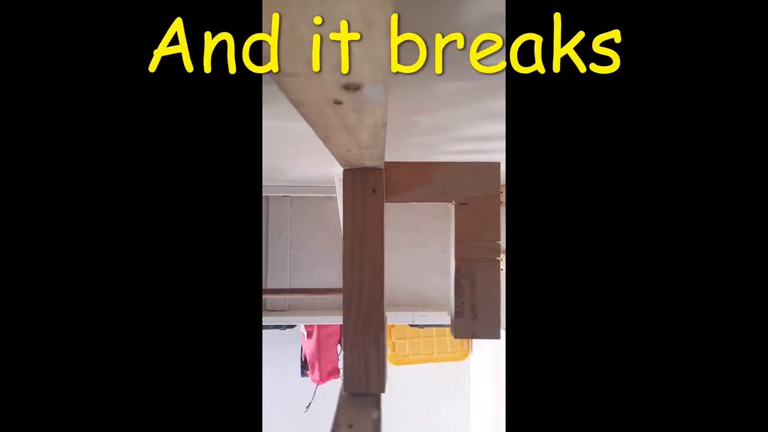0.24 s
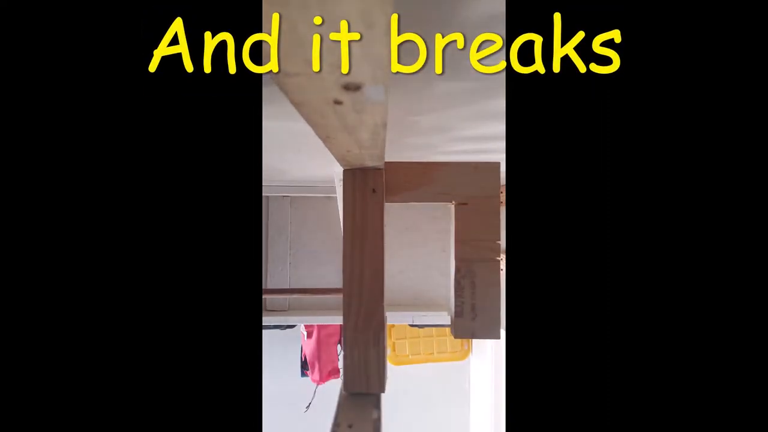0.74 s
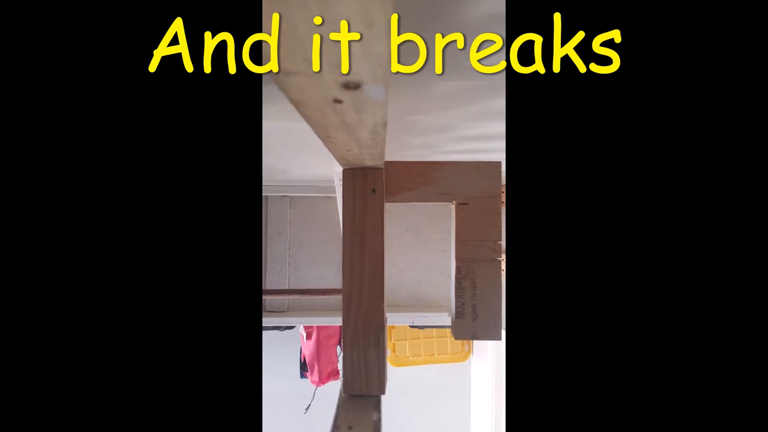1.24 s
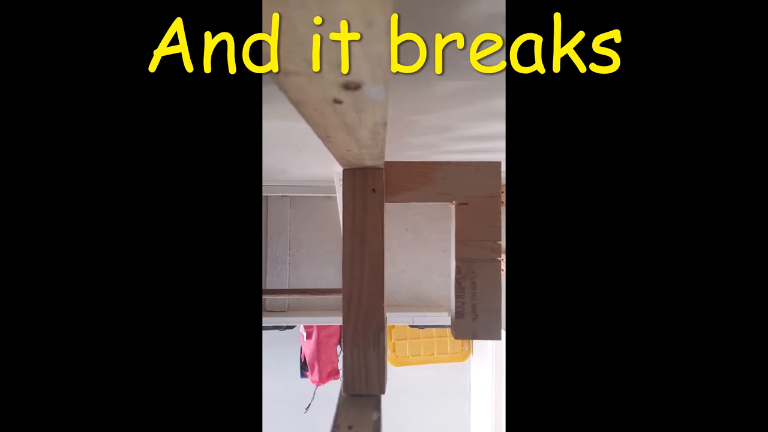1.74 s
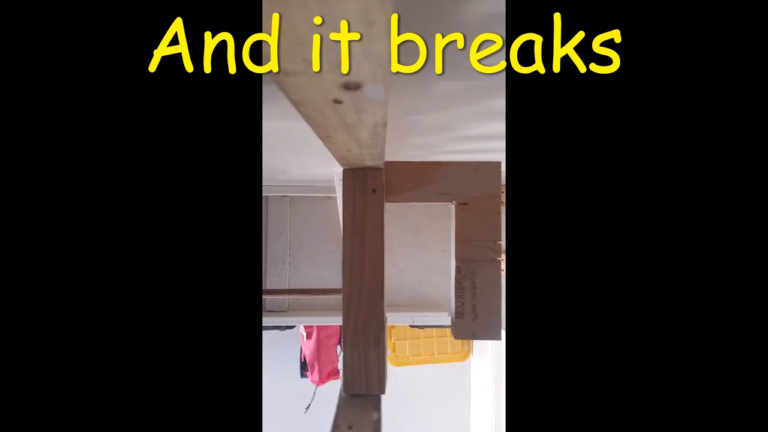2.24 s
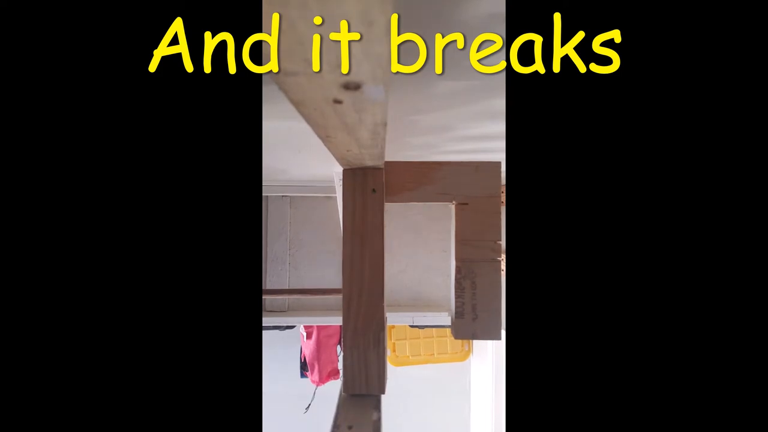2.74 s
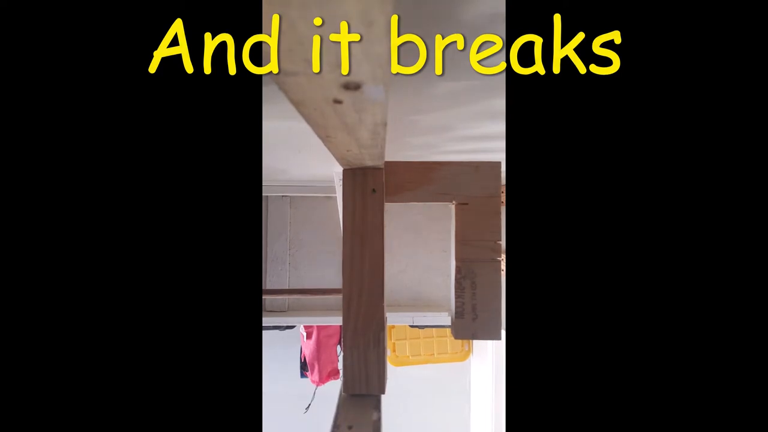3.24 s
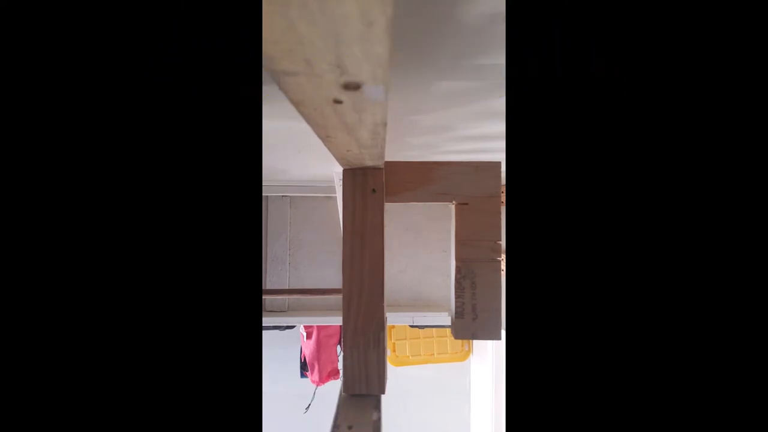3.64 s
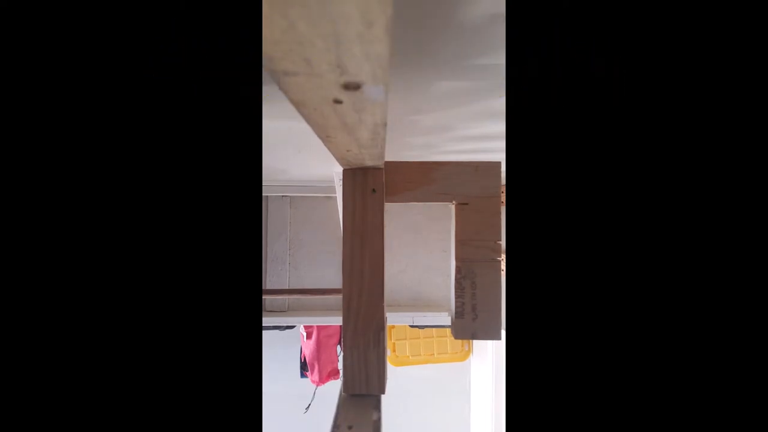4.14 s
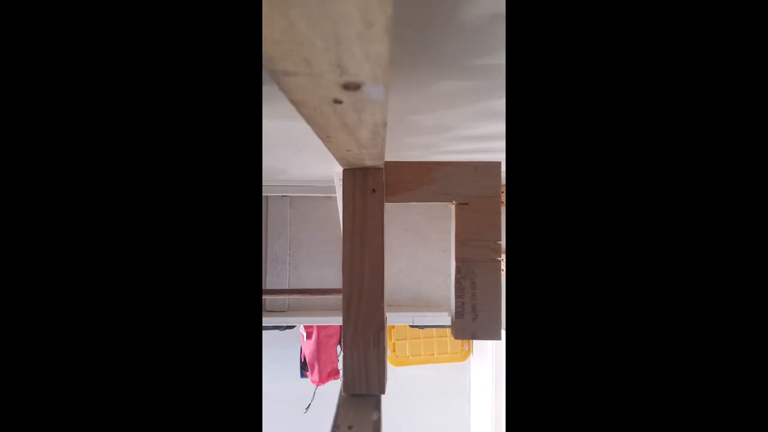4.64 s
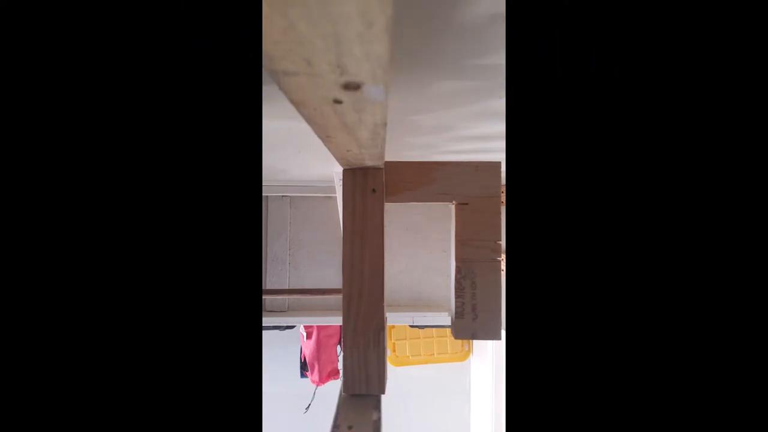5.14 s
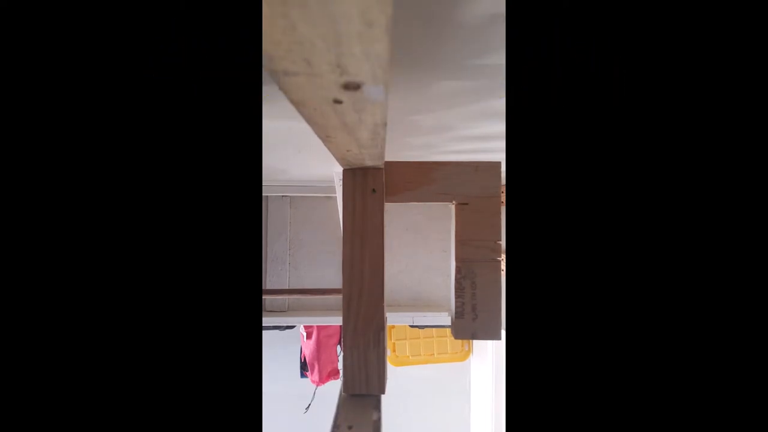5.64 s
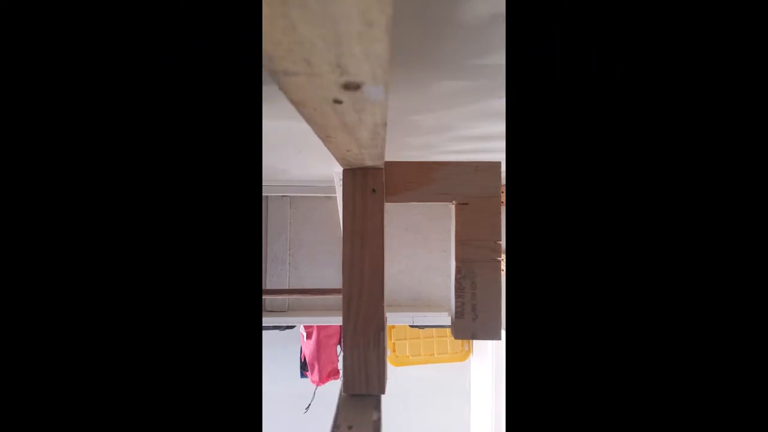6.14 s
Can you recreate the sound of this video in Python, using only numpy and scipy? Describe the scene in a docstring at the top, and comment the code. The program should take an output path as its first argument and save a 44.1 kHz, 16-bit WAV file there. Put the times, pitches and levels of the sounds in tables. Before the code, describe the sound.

A thin, sizzling air leak grows loud and blows on the microphone, stops dead, then small clicks and a rising low compressor drone.

```python
"""Compressed air hisses from a leaking nailer in a workshop; the jet swings closer, blows on the microphone and stops.
The jet is shaped noise with fluttering, half-whistling resonances; its wind is low noise in gusts, plus soft thumps.
A piston compressor hums behind it, faded in by the gain: tones and noise locked to the turning crank.
A few small clicks, bursts of noise with a short ring, sound; later the level dips briefly."""
import sys
import numpy as np
from scipy import signal
from scipy.fft import rfft, irfft, next_fast_len
from scipy.io import wavfile
from scipy.ndimage import uniform_filter1d, map_coordinates

SR = 44100
rng = np.random.default_rng(int(sys.argv[2]) if len(sys.argv) > 2 else 0)


def bounce(signal):
    """Save signal as a 16-bit WAV file at the path given by the first command-line argument."""
    frames = np.transpose(np.atleast_2d(signal))
    limited = np.clip(frames, -1, 1)
    pcm = np.round(limited * 32767).astype(np.int16)
    wavfile.write(sys.argv[1], SR, pcm)


N = 281181

# strength of the jet as the nailer comes closer, for rush, sizzle and air stream: (time [s], level [dB])
JET_STRENGTH = [(0, -57), (.7, -56), (1.2, -52.5), (1.62, -43), (1.84, -37.5), (2.36, -39.5)]
# the sizzle is beamed where the jet points: (time [s], relative level [dB], left-right difference [dB])
SIZZLE_AIM = [(0, 9, 0), (.38, 9.5, -2), (.5, 8.5, 1.5), (.8, 8.5, 0.5), (1.2, 6.5, 1.5), (1.5, 7.5, 0),
              (1.63, 7, -1.5), (1.8, 9, -2), (2.0, 10, -0.5), (2.09, 7.8, -1.5), (2.35, 8, -1.5)]
# resonances of the gap that swell and fade as the nailer moves:
# (centre [Hz], half width [Hz], gain [dB], strongest at [s], half length [s])
GAP_RESONANCES = [(12350, 220, 0, .3, 0.24), (11700, 230, 1, 0.73, 0.37), (13150, 140, -1.5, .8, .4),
                  (12330, 140, 3.5, 1.45, 0.2), (12100, 50, -4, 1.9, .25), (12455, 30, -1, 1.8, .3),
                  (12700, 350, -5, 1.95, .35), (12000, 150, -7, 1.95, .2), (11600, 25, -2, 1.9, .3),
                  (3850, 200, -4, 0.31, 0.74), (2100, 150, -10, 0.7, 0.39), (6600, 200, -7, 0.96, 0.38),
                  (4430, 150, -10, 1.55, .5)]
# spectrum of the high sizzle: (frequency [Hz], relative density [dB])
SIZZLE_SPECTRUM = [(7000, -57), (8500, -26), (9100, -21.5), (9700, -15), (10500, -16.5), (11100, -7.5),
                   (11800, -4.7), (12400, -4.5), (13200, -6), (13800, -10), (15000, -10.5), (15900, -13)]
# spectrum of the broad rush: (frequency [Hz], relative density [dB])
RUSH_SPECTRUM = [(300, -15), (520, -19.5), (660, -13), (850, -10), (1050, -8), (1370, -7), (1630, -9.5),
                 (2000, -3), (2400, -2.5), (2800, -4.5), (3150, -4.5), (3750, 0), (5200, 0), (6900, -1.5),
                 (7600, -5.5), (8500, -18), (11000, -37)]
# how alike the jet is in the two channels: (frequency [Hz], likeness [-1 to 1])
JET_LIKENESS = [(600, 0.39), (1400, -0.35), (3100, 0.5), (7000, -0.033), (12500, 0.18), (15000, 0.35)]
# colour of the jet at the two ports, after its direction: (frequency [Hz], left-right difference [dB])
JET_PORT_COLOUR = [(1000, 1.5), (2600, 0.5), (4000, 1), (4900, 4), (5800, 4), (7000, 2), (8500, -7),
                   (10300, 5.5), (11600, 2), (12400, 2), (13200, -2.5), (14300, -4), (15500, 5)]
JET_LAG_S = .000095  # the jet reaches the right port first
SHUT_S, SHUT_TAKES_S, SHUT_CURVE = 2.348, 0.1, 1.9  # the leak closes: start, time to fall 60 dB, ever faster

# gusts of air on the microphone: (start [s], hold [s], relative level [dB], small eddies over the buffet [dB])
WIND_GUSTS = [(0, 0.068, -67, -22), (.19, .04, -69, -17), (0.3, 0.1, -70.5, -14), (.55, 0.082, -70, -10.5),
              (1.465, 0.028, -65.5, -5), (1.762, 0.041, -56, -8), (1.877, 0.085, -55, -8),
              (2.031, 0.088, -51.5, 1.5), (2.172, 0.095, -50, -5), (2.288, 0.095, -51.5, -8),
              (2.49, 0.047, -51, -14.5), (2.585, 0.042, -53, -16)]
GUST_RISE_DB_PER_S, GUST_FALL_DB_PER_S = 202, 171  # every gust arrives and dies alike
STREAM_DB = -26.5  # the steady air stream on the microphone, against the jet
# spectrum of the low buffeting: (frequency [Hz], relative density [dB])
BUFFET_SPECTRUM = [(20, -31), (35, -12), (55, 3), (125, -1.5), (200, -10), (350, -22), (550, -43),
                   (1200, -57)]
# spectrum of the smaller, higher eddies: (frequency [Hz], relative density [dB])
EDDY_SPECTRUM = [(80, -28), (150, -4), (260, -1.5), (420, -8), (600, -15), (1000, -21), (2500, -63)]

CRANK_HZ = 44.67
# level at which the compressor is heard, as the gain lets it in by steps: (time [s], relative level [dB])
PUMP_GAIN = [(0, -57), (.9, -38.5), (1.4, -19), (2.4, -12.5), (3.4, -12.5), (3.9, -8.5), (4.42, -8.5),
             (5.16, -0.24), (5.9, 1.05)]
# low throb of the piston: (multiple of the crank rate, relative level [dB])
THROB_ORDERS = [(1, -4.7), (2, 0), (3, -11), (4, -7.5), (5, -11.5), (6, -18.5), (7, -8.5), (8, -32),
                (9, -15.5), (10, -12), (11, -18.5), (12, -18), (13, -27), (14, -18.5), (15, -15), (16, -14),
                (17, -15.5), (18, -27), (19, -21), (20, -26.5), (21, -24.5), (22, -29), (23, -14),
                (24, -14), (25, -35), (26, -22), (27, -15.5), (28, -15), (29, -18.5), (31, -21.5)]
# higher whine of the machine: (multiple of the crank rate, relative level [dB])
WHINE_ORDERS = [(34, -8), (40, -11), (44, 0), (46, -1), (50, -8), (54, -11), (55, 0.5), (56, -3.5),
                (60, -8), (64, -11), (72, -3.5)]
# crank orders caught by a narrow resonance: (multiple of the crank rate, relative level [dB])
WHISTLE_ORDERS = [(65, -2.5), (66, -4.5), (67, -1.5)]
# level of the whistle, which swells late in the scene: (time [s], relative level [dB])
WHISTLE_SWELL = [(4.6, -65), (5.3, -60.5), (5.65, -60.5), (5.82, -59), (6.0, -61.5), (6.3, -57.5)]
# motor tones of fixed pitch: (frequency [Hz], relative level [dB])
MOTOR_TONES = [(119.6, -63.5), (328, -62.5), (343.3, -57.5)]
# spectrum of the casing noise: (frequency [Hz], relative density [dB])
CASING_SPECTRUM = [(25, -7), (60, -1), (150, 0.5), (230, -1.5), (320, 0), (420, -1.5), (560, -5),
                   (720, 2.5), (820, -4.5), (1000, -5), (1150, -6), (1340, -2.5), (1490, -5), (1680, -2.5),
                   (1880, 1), (2100, 0), (2400, -1), (2750, -8.5), (3600, -42)]
# spectrum of the intake noise: (frequency [Hz], relative density [dB])
INTAKE_SPECTRUM = [(1800, -16), (3100, 2.5), (3900, 0.5), (4900, 3), (6700, -5.5), (7600, -11),
                   (8500, -28.5), (9700, -5), (10500, -11), (11500, -1.5), (12400, 0.5), (13400, -4),
                   (14500, -4.5), (15800, -11)]
# how alike the pump is in the two channels: (frequency [Hz], likeness [-1 to 1])
PUMP_LIKENESS = [(110, 0.96), (290, 0.8), (640, 0.41), (1400, -0.28), (3100, -0.2), (7000, 0.014),
                 (15000, -0.033)]
# colour of the pump at the two ports, after its direction: (frequency [Hz], left-right difference [dB])
PUMP_PORT_COLOUR = [(100, 1.5), (1800, 1.3), (2600, 1), (3500, 2), (5800, 1), (6700, 4), (7700, -6),
                    (9500, 1), (10600, 0), (12400, -2.5), (15000, 0)]

# single thumps of air: (time [s], relative level [dB], frequency [Hz])
AIR_PUFFS = [(1.487, -53, 90), (1.972, -51, 65), (2.025, -40.5, 75), (2.062, -48, 230), (2.115, -45, 120),
             (2.24, -44, 60), (2.29, -48, 150), (2.383, -42, 84.6), (2.51, -43, 110), (2.535, -51, 50)]

# clicks: (time [s], relative level [dB], lowest [Hz], highest [Hz], relative ring level [dB], t60 of the fade [s],
#          left-right difference of the direct sound [dB])
CONTACT_CLICKS = [(2.4835, -57, 10500, 15500, -28, .004, 0), (3.1374, -36.5, 1700, 3880, -22, .008, -4),
                  (3.138, -52, 1500, 9500, -14, 0.0095, 0), (3.156, -56, 1500, 3000, -12, .025, 0),
                  (3.345, -57, 900, 1700, -22, .013, 0), (3.3712, -44.5, 1400, 6600, -4, .011, -3)]
# ringing modes shared by the clicks: (frequency [Hz], relative level [dB])
CLICK_RING_MODES = [(2490, 2), (4150, -10), (4850, -2), (5900, -9)]
CLICK_ATTACK_S, CLICK_ROOM_DB, CLICK_ROOM_T60_S = .0008, -6, 0.15  # rise, level and length of the room tail

DIP_S, DIP_WIDTH_S, DIP_DB = 5.569, 0.018, -32  # the brief dip in level: centre, half width, depth
LOW_CUT_HZ, TOP_HZ = 30, 15780  # the microphone sheds the deepest rumble and all above its top


def amp(db):
    """Decibels to gain."""
    return 10 ** (np.asarray(db) / 20)


def unit(x):
    """x at rms 1."""
    return x / np.sqrt(np.mean(x ** 2) + 1e-20)


def along(points, hz):
    """Read (Hz, value) points on a log frequency axis."""
    f, v = np.transpose(points)
    return np.interp(np.log(hz + 1), np.log(f + 1), v)


def curves(rows):
    """One value per sample for each column after the time."""
    s, *cols = np.transpose(rows)
    return [np.interp(np.arange(N) / SR, s, c) for c in cols]


def wobble(rate):
    """A smooth random curve, rate knots a second."""
    knots = rng.standard_normal(int(N * rate / SR) + 4)
    return map_coordinates(knots, [np.arange(N) * rate / SR])


def filtered(x, response):
    """x shaped by a response of frequency."""
    m = next_fast_len(N + SR // 2)
    return irfft(rfft(x, m) * response(np.fft.rfftfreq(m, 1 / SR)), m)[..., :N]


def pan(left_db):
    """Gains of the two channels for a left-right difference in dB, steady or moving."""
    return amp(np.array([[.5], [-.5]]) * left_db)


def white():
    """Two unrelated noises."""
    return rng.standard_normal((2, N))


def coloured(pair, spectrum, alike):
    """Two unrelated signals turned into stereo of rms 1 with this spectrum and left-right likeness."""
    def mid_side_gains(hz):
        turn = np.arccos(np.clip(along(alike, hz), -1, 1)) / 2
        return amp(along(spectrum, hz)) * [np.cos(turn), np.sin(turn)]

    mid, side = filtered(pair, mid_side_gains)
    return unit(np.array([mid + side, mid - side]))


def reflected(pair, reach, sway, echo_db, count=6):
    """Adds separate echoes of nearby surfaces to each signal, about reach seconds late at most and swaying by sway."""
    n = np.arange(N)

    def echo():
        delay_s = reach * rng.uniform(0.1002, 1) + sway * wobble(1.483)
        return np.interp(n - SR * delay_s, n, pair[0])

    return np.array([x + amp(echo_db) * sum(echo() for _ in range(count)) for x in pair])


def ports(pair, sides, lag=0):
    """Stereo as the two ports hear it: each has its own colour, and the left one is lag seconds late."""
    def response(hz):
        return pan(along(sides, hz)) * np.exp(1j * np.pi * hz * lag * np.array([[-1], [1]]))

    return filtered(pair, response)


def jet_db():
    """Strength of the jet in dB: it grows as the nailer nears and plunges as the leak closes."""
    closing = np.clip((np.arange(N) / SR - SHUT_S) / SHUT_TAKES_S, 0, 2) ** SHUT_CURVE
    return curves(JET_STRENGTH)[0] - 60 * closing


def spits(rate, spread_db):
    """Sparse sharp impulses of uneven size, rate a second, at rms 1."""
    strikes = rng.random(N) < rate / SR
    return unit(strikes * amp(spread_db * rng.standard_normal(N)) * white())


def eddying(pair, depth_db):
    """Passing eddies brighten and dim narrow bands, each for a few hundredths of a second."""
    z = signal.stft(pair, nperseg=1024)[2]
    field = rng.standard_normal(z.shape[1:])
    for axis in (0, 1):  # smooth over frequency, then time
        field = uniform_filter1d(field, size=4, axis=axis)
    return signal.istft(z * amp(depth_db * unit(field)), nperseg=1024)[1][:, :N]


def leak():
    """A turbulent jet from a narrow gap: a high sizzle over a broad rush, fluttering together, each with its own spits."""
    t = np.arange(N) / SR
    beam_db, left_db = curves(SIZZLE_AIM)
    flutter_db = 0.55 * wobble(24.02) + .5 * wobble(240)

    def jet(depth_db):
        return eddying(white() + amp(-14.5) * spits(rate=410, spread_db=1.5), depth_db)

    sizzle = reflected(jet(depth_db=2.5), reach=.004, sway=.00006, echo_db=-22)
    sizzle = coloured(sizzle, SIZZLE_SPECTRUM, JET_LIKENESS)
    rush = reflected(jet(depth_db=2.8), reach=.009, sway=0.0003, echo_db=-17.5)
    rush = coloured(rush, RUSH_SPECTRUM, JET_LIKENESS)
    hiss = amp(beam_db - 1.93) * sizzle * pan(left_db) + amp(-0.58) * rush
    # the gap half whistles: its resonances stand out of the hiss, each for a while
    ringing = np.zeros((2, N))
    for hz, width, db, s, length in GAP_RESONANCES:
        swell = np.exp(-((t - s) / length) ** 2)
        ringing += amp(db) * swell * filtered(hiss, lambda f: 1 / (1 + ((f - hz) / width) ** 2))
    return amp(jet_db() + flutter_db) * ports(hiss + ringing, JET_PORT_COLOUR, JET_LAG_S)


def draught():
    """Each gust rises, holds and falls away; it buffets the left port most and sheds smaller, higher eddies."""
    t = np.arange(N) / SR

    def gust(s, hold):
        rise_db = -GUST_RISE_DB_PER_S * np.maximum(s - t, 0)
        fall_db = -GUST_FALL_DB_PER_S * np.maximum(t - s - hold, 0)
        return amp(rise_db + fall_db)

    # the strongest gust of the moment sets the level
    push = np.max([amp(db) * gust(s, hold) for s, hold, db, _ in WIND_GUSTS], axis=0)
    swirl = np.max([amp(db + eddy_db) * gust(s, hold) for s, hold, db, eddy_db in WIND_GUSTS], axis=0)
    stream = amp(jet_db() + STREAM_DB)
    buffet = np.hypot(stream, push) * coloured(white(), BUFFET_SPECTRUM, [(100, 0.078)])
    eddies = swirl * coloured(white(), EDDY_SPECTRUM, [(100, 0.25)])
    return amp(2.37 * wobble(26)) * (buffet + eddies) * pan(14.2)


def crank_tones(orders, turns, waver, swell_db):
    """Wavering tones on multiples of the crank rate; the room sets the higher ones out of step between the ears."""
    out = np.zeros((2, N))
    for k, db in orders:
        apart = np.arccos(np.clip(along(PUMP_LIKENESS, k * CRANK_HZ), -1, 1)) * rng.choice([-1, 1])
        phase = 2 * np.pi * (np.round(k) * turns + rng.random()) + waver * np.sqrt(k) * wobble(9)
        level = amp(db + swell_db * np.sqrt(k) * wobble(5))
        out += level * np.sqrt(2) * np.sin([phase + apart / 2, phase - apart / 2])
    return out


def motor_hum():
    """Motor tones of fixed pitch that waver a little in level and phase."""
    out = np.zeros(N)
    for hz, db in MOTOR_TONES:
        level = amp(db - 4.0 + 1.6 * wobble(4.3))
        phase = 2 * np.pi * hz * np.arange(N) / SR + 0.77 * wobble(5)
        out += level * np.sqrt(2) * np.sin(phase)
    return out


def casing_rattle(turns):
    """The same rattle comes round with every turn: one turn of noise, read by crank angle."""
    one_turn = rng.standard_normal((2, int(SR / CRANK_HZ)))
    rattle = one_turn[:, (turns % 1 * one_turn.shape[1]).astype(int)]
    tone_db = [(900, -20.5), (1400, -6.5), (3000, -13), (7000, -17.5)]  # (frequency [Hz], gain [dB])
    return filtered(rattle, lambda hz: amp(along(tone_db, hz)))


def compressor():
    """Each crank turn pumps a low throb, rattles the casing alike and gulps air through the intake."""
    fade_in = amp(curves(PUMP_GAIN)[0])
    turns = np.cumsum(CRANK_HZ + 0.04983 * wobble(3)) / SR
    throb = amp(-48.5) * crank_tones(THROB_ORDERS, turns, waver=0.035, swell_db=0.55)
    whine = amp(-64.0) * crank_tones(WHINE_ORDERS, turns, waver=0.046, swell_db=0.38)
    whistle = amp(curves(WHISTLE_SWELL)[0]) * crank_tones(WHISTLE_ORDERS, turns, waver=0.074, swell_db=0.25)
    tones = throb + motor_hum() + whine + whistle
    rattle = casing_rattle(turns)
    # the noise swells once and twice a turn
    gulp = amp(0.56 * np.cos(2 * np.pi * turns) + 0.41 * np.cos(4 * np.pi * turns) + 0.085 * wobble(8.1))
    casing = reflected(white() + rattle, reach=.014, sway=0, echo_db=-20)
    casing = amp(-45.5) * coloured(casing, CASING_SPECTRUM, PUMP_LIKENESS)
    intake = reflected(white() + rattle, reach=.009, sway=0, echo_db=-19.5)
    intake = amp(-48.0) * coloured(intake, INTAKE_SPECTRUM, PUMP_LIKENESS)
    return ports(fade_in * (tones + gulp * (casing + intake)), PUMP_PORT_COLOUR)


def puffs():
    """Single large eddies hit the left port hardest, as soft low thumps."""
    t = np.arange(N) / SR

    def thump(cycles):
        return -np.cos(2 * np.pi * cycles) * np.exp(-(cycles / 0.72) ** 2)

    return sum(amp(db) * thump((t - s) * hz) for s, db, hz in AIR_PUFFS) * pan(15)


def clicks():
    """Small hard contacts: a crack that fills its band evenly, a few milliseconds of ring and a faint room tail."""
    out, t = np.zeros((2, N)), np.arange(SR // 4) / SR
    for s, db, low_hz, high_hz, ring_db, t60, left_db in CONTACT_CLICKS:
        fade = amp(-60 * t / t60) * (1 - np.exp(-t / CLICK_ATTACK_S)) ** 2
        burst = rng.standard_normal(len(t))
        for _ in range(4):  # a short burst with the same strength at every frequency
            burst = irfft(np.exp(1j * np.angle(rfft(burst * np.sqrt(fade)))), len(t))
        edges_hz = np.clip([low_hz, high_hz], 100, TOP_HZ)
        band = signal.butter(N=3, Wn=edges_hz, btype="band", fs=SR, output="sos")
        crack = unit(signal.sosfilt(band, burst)) * np.sqrt(np.mean(fade ** 2))
        ring = np.zeros((2, len(t)))
        for hz, level in CLICK_RING_MODES:
            phase = rng.normal(0, 0.6, (2, 1)) + rng.uniform(0, 2 * np.pi)  # a little apart in the two channels
            ring += amp(level + ring_db) * np.sin(2 * np.pi * hz * t + phase)
        snap = crack + ring * fade
        tail = rng.standard_normal((2, len(t))) * amp(-60 * t / CLICK_ROOM_T60_S)
        room = signal.fftconvolve(snap, tail / np.linalg.norm(tail[0]), axes=1)[:, :len(t)]
        click = snap * pan(left_db) + amp(CLICK_ROOM_DB) * room
        out[:, round(s * SR):][:, :len(t)] += amp(db + 8.5) * click
    return out


def scene():
    """Leak, air stream, compressor, thumps of air and clicks together."""
    return leak() + draught() + compressor() + puffs() + clicks()


def record(dry):
    """The level dips briefly once; the deepest rumble is thinned and nothing is kept above the microphone's top."""
    dip = amp(DIP_DB * np.exp(-((np.arange(N) / SR - DIP_S) / DIP_WIDTH_S) ** 2))
    return filtered(dry * dip, lambda hz: (hz < TOP_HZ) * hz ** 4 / (hz ** 4 + LOW_CUT_HZ ** 4))


dry = scene()
out = record(dry)
bounce(out)
```